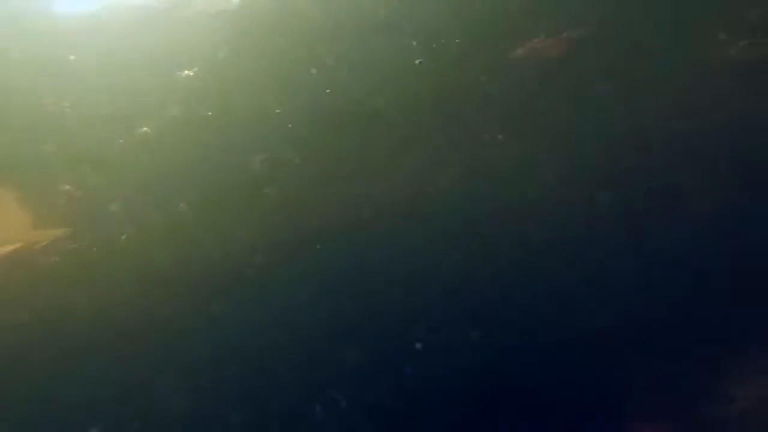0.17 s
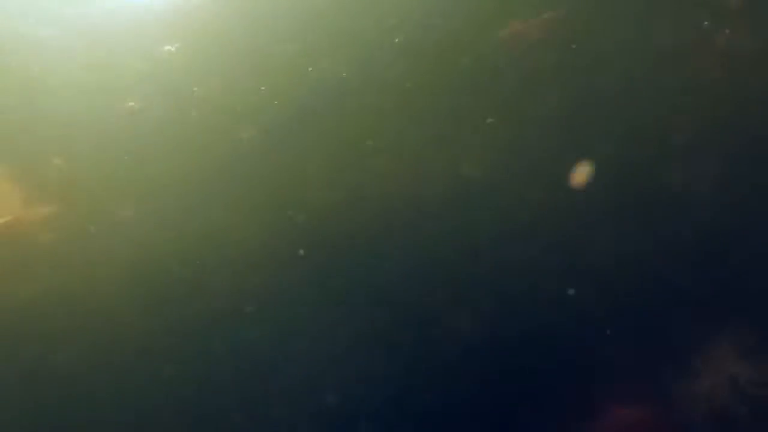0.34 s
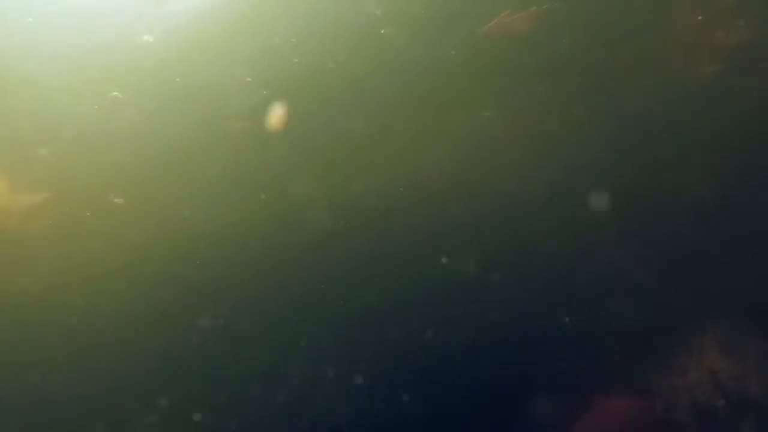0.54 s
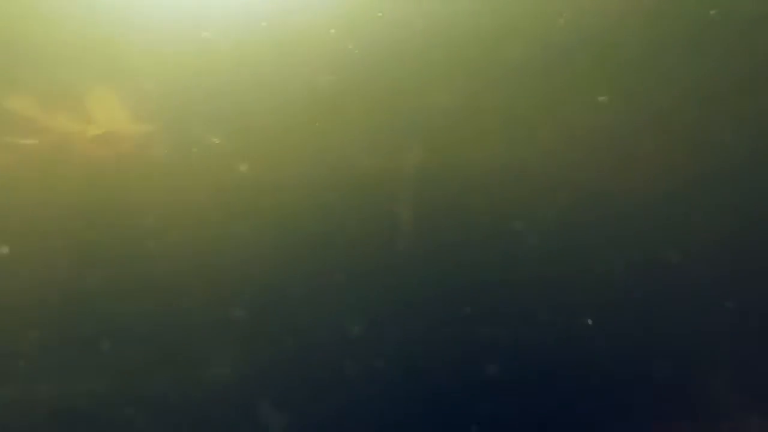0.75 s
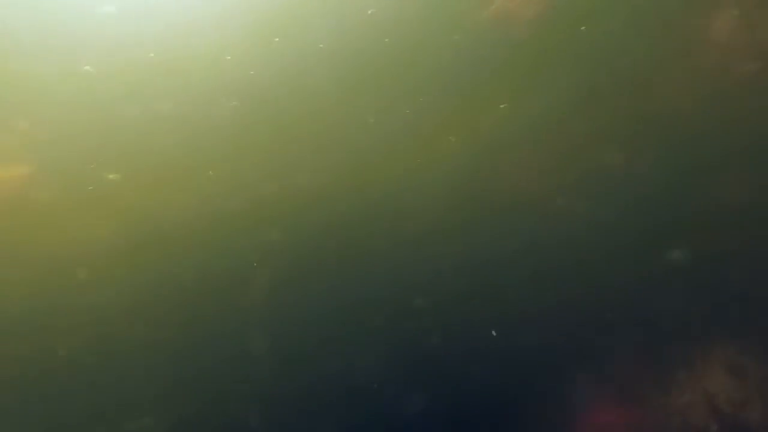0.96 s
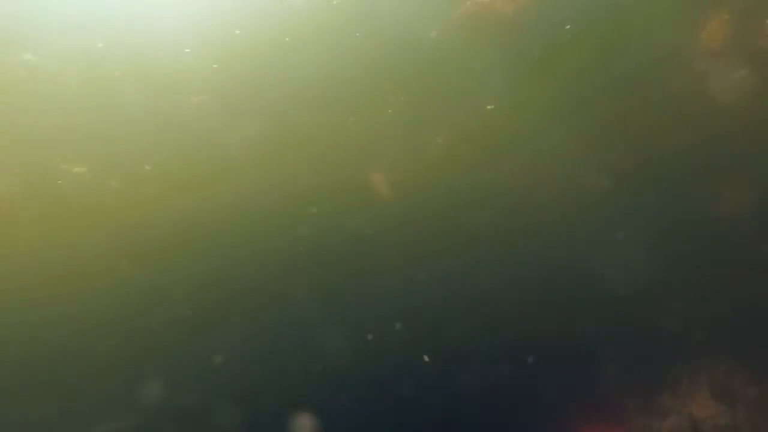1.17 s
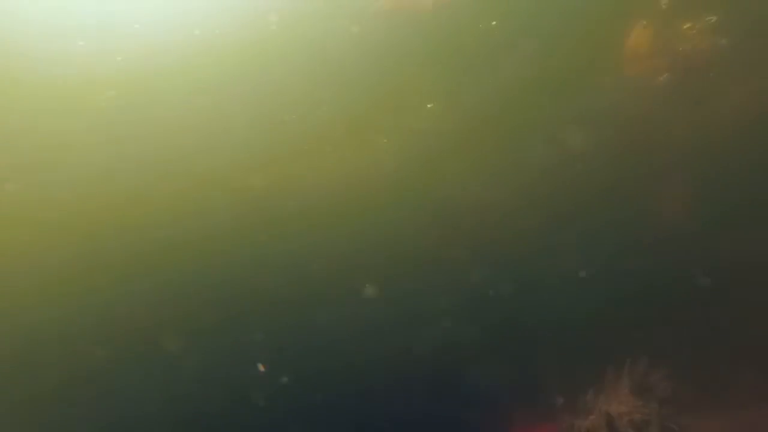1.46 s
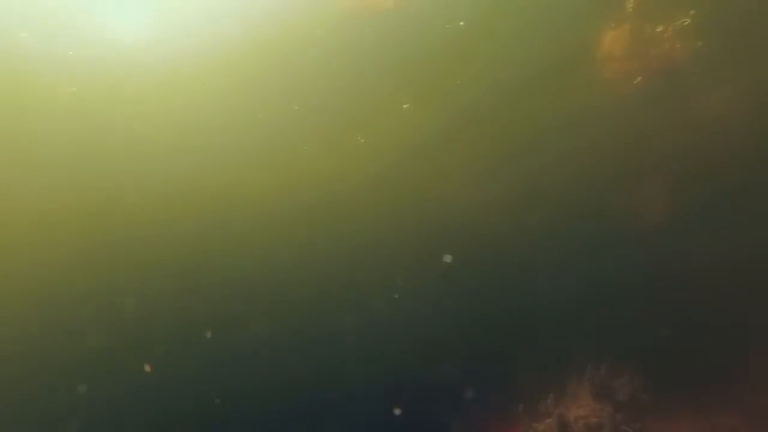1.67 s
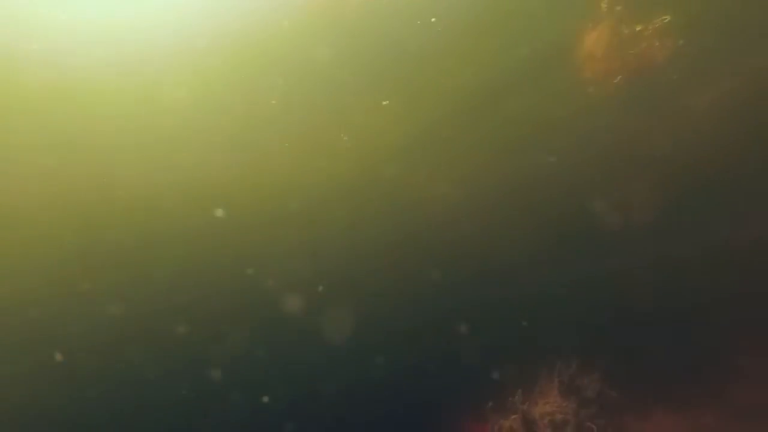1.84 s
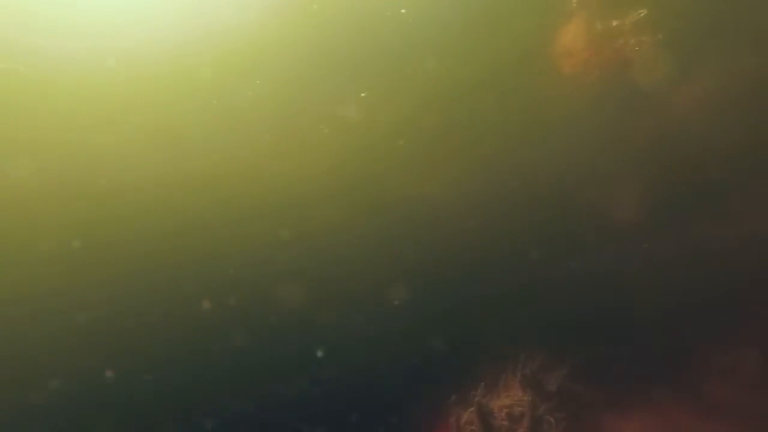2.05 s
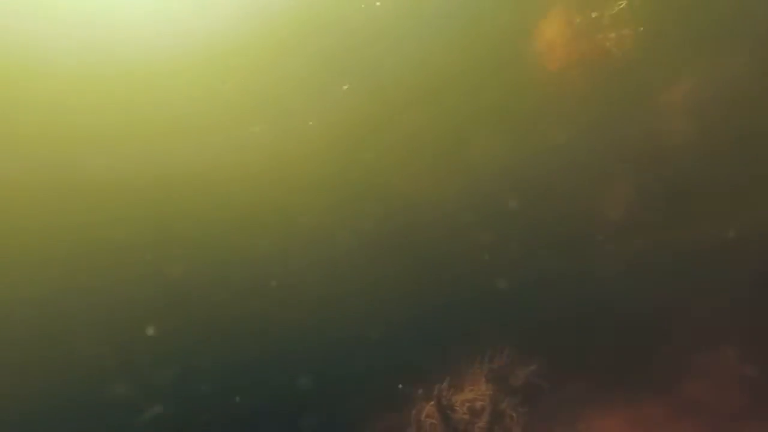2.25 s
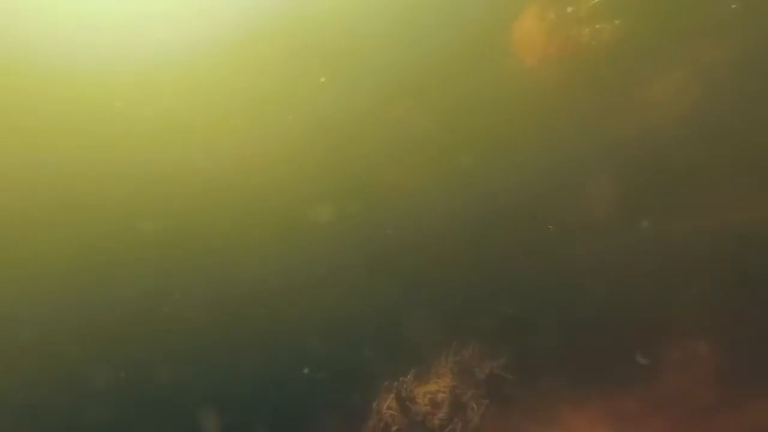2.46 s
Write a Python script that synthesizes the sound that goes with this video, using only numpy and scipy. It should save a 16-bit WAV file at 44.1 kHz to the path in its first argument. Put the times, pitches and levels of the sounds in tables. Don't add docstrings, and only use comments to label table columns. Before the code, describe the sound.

Hollow scuffs, creaks and knocks of a camera housing handled underwater, over a low pump hum

```python
import sys
import numpy as np
from scipy import signal
from scipy.io import wavfile
from scipy.ndimage import uniform_filter1d

SR = 44100
rng = np.random.default_rng(int(sys.argv[2]) if len(sys.argv) > 2 else 0)


def volts_from_decibels(level):
    exponent = np.asarray(level, float) / 20
    return 10 ** exponent


def master(y):
    cut = np.clip(np.atleast_2d(y).T, -1, 1)
    pcm = np.round(cut * 32767)
    wavfile.write(sys.argv[1], SR, pcm.astype(np.int16))


N = 114660
T = np.arange(N) / SR
THROB_HZ, THROB_AT_S = 120, 2.1055


def column(table, k):
    a = np.array(table)
    return np.interp(T, a[:, 0], a[:, k])


def level(x, db):
    return x * volts_from_decibels(db) / np.sqrt(np.mean(x ** 2))


def noise():
    return rng.standard_normal(N)


def band(x, hz, width):
    return signal.lfilter(*signal.iirpeak(hz, hz / width, fs=SR), x)


def steep(x, hz, width):
    return band(band(x, hz, width), hz, width)


def ring_modes(x, modes, widen, contrast=1., sign=1):
    return sum(sign ** k * volts_from_decibels(contrast * db) * level(steep(x, hz, widen * width), 0)
               for k, (hz, width, db) in enumerate(modes))


def walk(rate):
    k = int(SR / rate)
    steps = np.repeat(rng.standard_normal(N // k + 1), k)
    return 1.87 * uniform_filter1d(uniform_filter1d(steps, k), k)[:N]


def decay(start, fall):
    return np.exp(-np.maximum(T - start, 0) / fall)


def struck(start, hz, db, t60, glide=0., rise=0.00047):
    t = np.maximum(T - start, 0)
    envelope = volts_from_decibels(db - 60 * t / t60) * (1 - np.exp(-t / rise))
    return envelope * np.sin(2 * np.pi * hz * (t + glide * t ** 2 / 2))


def pump_turns():
    return (T - THROB_AT_S) * THROB_HZ


# (frequency [Hz], level [dB rms])
HUM = [(60, -49.5), (120, -25.5), (180, -42), (240, -34.5), (300, -43), (360, -38), (420, -50.5),
       (480, -37), (540, -54.5), (600, -35.5), (720, -52), (780, -51), (900, -55)]
# (time [s], throb level [dB], overtone level [dB])
COUPLING = [(0, -34, -33.5), (.38, -29.5, -30.5), (.67, -34.5, -30), (.84, -23, -35), (1.04, -24, -37),
            (1.14, -35.5, -44.5), (1.32, -25.5, -36.5), (1.6, -26, -35.5), (2.6, -26, -42)]


def pump_hum():
    wobble_db, scatter_rad_per_db = .9, .12
    turn, out = pump_turns(), 0
    low, high = column(COUPLING, 1) + 26, column(COUPLING, 2) + 38
    for hz, db in HUM:
        overtone = hz > 130
        coupling = high * min(hz / 360, 1) ** 2 if overtone else low
        loudness = volts_from_decibels(db + coupling + wobble_db * (1 + overtone) * walk(20))
        scatter = scatter_rad_per_db * np.maximum(high, 4) * overtone * (-1) ** (hz // THROB_HZ)
        phase = 2 * np.pi * turn * hz / THROB_HZ + scatter + 0.52 * walk(12)
        out = out + np.sqrt(2) * loudness * np.cos(phase)
    return out


# (frequency [Hz], width [Hz], level [dB])
SHELL = [(918, 103, 2), (1350, 100, -5), (1650, 186, 3.5), (2277, 133, 6.5), (3092, 192, -1.5),
         (3640, 110, -11.5), (5370, 200, -21.5), (6700, 250, -17), (9460, 460, -22), (12900, 6600, -32)]


def shell_rattle():
    turn = pump_turns()
    strength = volts_from_decibels(1.4 * rng.standard_normal(400))[np.floor(turn - turn[0] + .6).astype(int)]
    puff = np.exp(-((turn + .1) % 1) / 0.34)
    gate = (0.16 + strength * puff) * volts_from_decibels(0.51 * walk(9))
    return level(ring_modes(gate * noise(), SHELL, 1.82, sign=-1), -47)


# (frequency [Hz], width [Hz], level [dB])
HOLLOW = [(209, 160, -14), (300, 126, -3.5), (432.4, 59, -0.5), (545, 51.6, 4), (604.7, 44, -3.5),
          (684, 49, -11.5)]
# (time [s], rubbing level [dB])
RUB = [(0.0, -27), (.12, -24.5), (.2, -24), (.3, -24.5), (.4, -20), (.47, -27), (.56, -23.5), (.66, -23.5),
       (.72, -27.5), (.8, -23.5), (.9, -26.5), (1.05, -32.5), (1.2, -33), (1.5, -31.5), (1.8, -39.5),
       (2.6, -40.5)]


def rubbing():
    slips = (rng.random(N) < 900 / SR) * noise() * volts_from_decibels(1.33 * rng.exponential(size=N))
    body = level(ring_modes(slips, HOLLOW, 1.65), 0.74)
    bright = level(ring_modes(slips, SHELL, 2), -26)
    return (body + bright * np.exp(-(pump_turns() % 1) / 0.34)) * volts_from_decibels(column(RUB, 1))


# (time [s], peak level [dB], pitch [Hz])
SCUFFS = [(0.029, -17, 495), (0.047, -19, 595), (0.135, -19, 570), (0.148, -10, 586), (0.164, -14, 601),
          (0.213, -18, 517), (0.23, -17, 588), (0.315, -15.5, 576), (0.362, -13, 551), (0.373, -10.5, 587),
          (0.384, -13, 616), (0.409, -16, 616), (0.439, -18, 588), (0.49, -12, 570), (0.506, -9.5, 597),
          (0.532, -13.5, 588), (0.549, -13.5, 624), (0.584, -17.5, 591), (0.608, -12, 580),
          (0.631, -14.5, 636), (0.646, -11.5, 536), (0.657, -12, 568), (0.753, -16.5, 562)]


def scuffs():
    return sum(struck(s, hz, db + 1.5, 0.073, rise=0.0015) for s, db, hz in SCUFFS)


# (time [s], length [s], pitch [Hz], level [dB])
CREAKS = [
    (0.264, 0.0056, 628, -2.5),
    (0.812, 0.025, 705, -5),
    (0.917, 0.019, 718, -11.5),
    (0.968, 0.025, 694, -5.5),
    (1.007, 0.014, 713, -20),
]
# (frequency [Hz], level [dB])
CREAK_MODES = [(1020, -29.5), (1370, -32.5), (2600, -38), (3000, -48), (3480, -46.5)]


def creaks():
    rise_s, fall_s, wobble_rad = 0.0072, 0.009, .25
    out = 0
    for s, length, hz, db in CREAKS:
        envelope = (1 - decay(s, rise_s)) ** 1.38 * decay(s + length, fall_s)
        phase = 2 * np.pi * hz * (T - s) + wobble_rad * walk(120)
        tone = np.sin(phase) + volts_from_decibels(-33) * np.sin(2 * phase)
        edge = volts_from_decibels(-34.5) * (1 + np.cos(phase)) * level(steep(noise(), 1700, 1700), 0)
        edge = edge + sum(volts_from_decibels(g) * level(steep(noise(), f, 110), 0) for f, g in CREAK_MODES)
        out = out + volts_from_decibels(db + 1.6 * walk(100)) * (envelope * tone + envelope ** 0.69 * edge * 0.84)
    return out


# (time [s], peak level [dB])
SLAPS = [(0.0962, -28), (0.278, -38), (0.3047, -30), (0.321, -25.5), (0.3298, -26), (0.3464, -23),
         (0.3623, -22.5), (0.3716, -26), (0.3792, -21.5), (0.3963, -22), (0.4035, -23), (0.413, -31),
         (0.4214, -25), (0.4544, -26), (0.4718, -39), (0.4715, -27), (0.5038, -31), (0.5375, -26),
         (0.5537, -29), (0.5617, -30), (0.6045, -35), (0.6452, -21), (0.6544, -34), (0.7533, -26.5),
         (0.7965, -29.5), (0.8092, -27), (0.9187, -28.5), (1.8547, -33.5), (1.8836, -29.5), (1.8974, -34)]


def slaps():
    out = 0
    for s, db in SLAPS:
        puff = (T >= s) * decay(s, .0016) * noise()
        a = int(s * SR)
        puff, hit = puff[a:a + 2000], np.zeros(N)
        hit[a:a + 2000] = sum(volts_from_decibels(.7 * g) * steep(puff, hz, 2.5 * width) * np.sqrt(200 / width)
                              for hz, width, g in SHELL[1:7])
        out = out + volts_from_decibels(db) * hit / np.abs(hit).max()
    return out


def dulled(x):
    return signal.sosfilt(signal.butter(8, 3700, fs=SR, output="sos"), x)


# (time [s], pitch [Hz], level [dB], t60 [s])
KNOCKS = [(1.8604, 386, -3.5, 0.021), (1.881, 570, -13, 0.029), (1.8838, 363, -7, 0.061),
          (1.885, 683, -15.5, 0.093), (1.885, 1060, -26.5, 0.035), (1.893, 475, -20.5, 0.12),
          (1.905, 257, -16, 0.056), (1.922, 140, -26, .05), (.755, 308, -10.5, 0.066),
          (0.771, 300, -17, 0.05), (0.805, 294, -13, 0.16), (.835, 309, -12, 0.13), (.86, 290, -17.5, 0.12),
          (.935, 320, -22, 0.057), (1.028, 323, -18.5, .06), (.812, 591, -10.5, 0.16),
          (.918, 677, -16, .04), (.97, 316, -14.5, 0.13), (.845, 64.6, -9.5, 0.36)]


def knocks():
    return sum(struck(*knock, rise=0.00073) for knock in KNOCKS)


# (time [s], signed push [1])
JOLTS = [
    (0.102, .05),
    (0.299, .03),
    (.763, -.18),
    (.799, .16),
    (.832, .28),
    (.852, -.32),
    (.87, .26),
    (.902, -.43),
    (.915, .29),
    (.946, .09),
]
# (time [s], level [dB])
GROAN = [(.5, -46), (.63, -20), (.72, -28.5), (.77, -20), (.8, -24.5), (.83, -19.5), (.88, -22),
         (.95, -27.5), (1.15, -39)]


def sway():
    sway_hz, t60_s = 25.5, .6
    idle = level(steep(noise(), sway_hz * 0.56, 23.4), -31)
    groan = volts_from_decibels(column(GROAN, 1)) * level(steep(noise(), 144.6, 51), 0)
    return groan + idle + sum(push * struck(s, sway_hz, 0, t60_s, rise=0.005) for s, push in JOLTS)


# (time [s], pitch [Hz], level [dB], t60 [s])
BUBBLES = [(.009, 3500, -23, 0.025), (.009, 2930, -22.5, .02), (0.028, 2050, -18, 0.017),
           (.027, 1360, -15.5, 0.026), (.028, 2620, -14, 0.0072), (0.074, 1480, -27, 0.045),
           (.083, 1650, -18.5, 0.022), (0.135, 1720, -13.5, 0.012), (0.163, 1420, -19, 0.032),
           (0.209, 1265, -16.5, 0.021), (0.358, 1460, -21.5, 0.042), (.538, 2360, -21.5, 0.0091),
           (0.644, 2420, -23, 0.013), (0.658, 1570, -21, 0.013), (0.707, 1630, -4, 0.023),
           (0.704, 1044, -15.5, 0.027), (0.774, 2030, -21, 0.016), (0.817, 1350, -25.5, 0.049),
           (0.84, 1610, -22.5, 0.037), (0.923, 980, -23.5, 0.095), (.952, 2120, -27.5, 0.029),
           (1.0, 1230, -21, .03), (1.004, 1095, -21, 0.052), (1.017, 1320, -16.5, 0.047),
           (1.053, 2165, -19.5, 0.02), (1.054, 1530, -23.5, 0.023), (1.053, 1850, -21.5, .015),
           (1.053, 1290, -26, .015), (1.058, 3200, -34, 0.01), (1.077, 1860, -24.5, 0.019),
           (1.288, 1350, -31.5, 0.033)]


def bubbles():
    return sum(struck(*bubble, glide=3.1) for bubble in BUBBLES)


# (time [s], length [s], level [dB])
FLURRIES = [
    (.006, 0.015, -41),
    (0.312, 0.11, -38),
    (.643, .03, -42),
    (.75, 0.11, -41.5),
    (1.053, 0.0083, -38.5),
    (1.077, 0.006, -39),
    (1.643, 0.0214, -35),
    (1.884, .026, -41),
]


def flurries():
    rate = 2500 * np.exp(-(pump_turns() % 1) / .22)
    hits = (rng.random(N) < rate / SR) * noise() * volts_from_decibels(3.8 * rng.exponential(size=N))
    crackle = level(ring_modes(hits, SHELL, 2, contrast=1.05), 0)
    spells = sum(volts_from_decibels(db) * ((T > s) & (T < s + length)) for s, length, db in FLURRIES)
    return crackle * uniform_filter1d(spells, size=60)


TICK_S = .0016
# (time [s], peak level [dB], pitch [Hz])
TICKS = [(0.0271, -32, 4900), (0.217, -35.5, 4400), (0.355, -42, 5900), (.3716, -37, 5600),
         (.4783, -39.5, 6360), (.492, -43, 6600), (.5606, -42, 6600), (.208, -41, 7060),
         (.894, -44.5, 6800), (0.646, -41, 4800), (0.705, -44, 4470), (0.7357, -28.5, 4470),
         (0.847, -39.5, 4570), (0.9595, -39.5, 5180), (1.058, -33, 4300), (1.5155, -40, 5550),
         (1.5573, -42, 5520), (1.6546, -38, 4500), (1.7554, -40, 4820), (2.0148, -43, 6950),
         (2.2378, -41, 6800), (2.393, -39, 6500), (2.44, -43, 5500),
         (0.1401, -41.5, 12300), (0.2084, -45, 10900), (0.2917, -41.5, 12600), (0.4596, -39, 7500),
              (0.9581, -38, 10100), (1.42, -48, 7000), (1.5559, -46, 9190), (1.6851, -47, 10900),
              (2.0138, -51, 9400)]


def ticks():
    out = 0
    for s, db, hz in TICKS:
        burst = steep((T >= s) * decay(s, TICK_S) * noise(), hz, hz / 2.93)
        out = out + volts_from_decibels(db) * burst / np.abs(burst).max()
    return out


def grit():
    busy, out = volts_from_decibels(2.5 * walk(18)), 0
    for hz, db in [(4600, -75.5), (5500, -71.0), (6900, -76.5), (9500, -82), (12000, -80.5)]:
        hits = (rng.random(N) < 70 * busy / SR) * volts_from_decibels(2.2 * rng.exponential(size=N))
        puffs = signal.lfilter([1], [1, -np.exp(-1 / (TICK_S * SR))], hits) * noise()
        out = out + level(steep(puffs, hz, hz / 3), db)
    return out


# (frequency [Hz], level [dB per Hz])
WATER = [(20, -10.5), (66, -11), (115, -8.5), (600, -18), (1100, -50.5), (2230, -31.5), (4400, -51.5),
         (12000, -62)]


def water():
    out, (table_hz, table_db) = 0, np.transpose(WATER)
    for hz in 20 * 2 ** np.arange(0, 9.6, .5):
        db = np.interp(np.log(hz), np.log(table_hz), table_db) + 1.8 * walk(12)
        out = out + volts_from_decibels(db) * steep(noise(), hz, hz / 2)
    return level(out, -37.5)


# (time [s], level [dB])
GAIN = [(0, -59.5), (.5, -60), (.8, -61.5), (1.02, -69.5), (1.12, -68.5), (1.3, -62), (1.5, -60.5),
        (2.6, -61.5)]


def recorder_gain():
    return volts_from_decibels(column(GAIN, 1) + 65)


def scene():
    background = (shell_rattle() + water() + grit()) * recorder_gain()
    contact = dulled(rubbing() + creaks() + slaps())
    pings = bubbles() + knocks() + scuffs()
    return (pump_hum() + background + contact + flurries() + ticks() + pings + sway())[None]


def low_pass(x):
    return signal.sosfilt(signal.butter(12, 15700, fs=SR, output="sos"), x)


def record(dry):
    soft = np.tanh(0.56 * dry) / 0.63
    mix = signal.sosfilt(signal.butter(6, 13000, fs=SR, output="sos"), soft)
    return low_pass(mix)


dry = scene()
out = record(dry)
master(out)
```